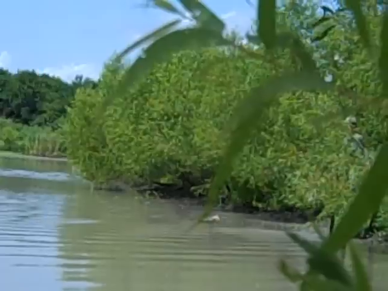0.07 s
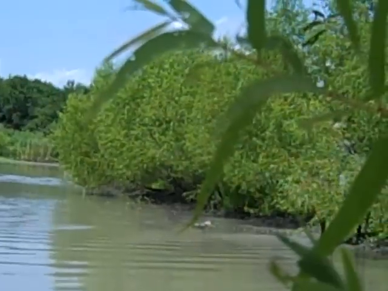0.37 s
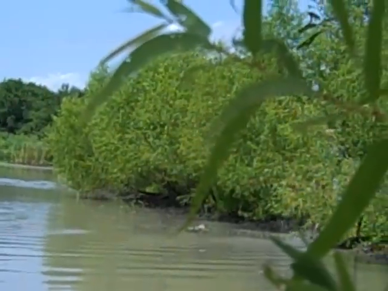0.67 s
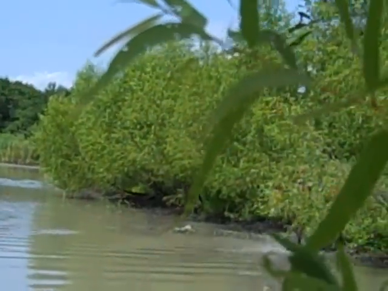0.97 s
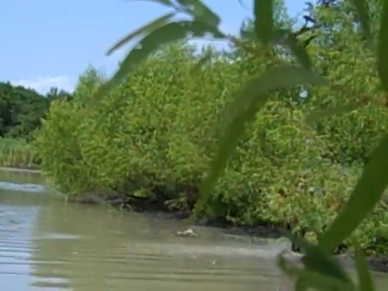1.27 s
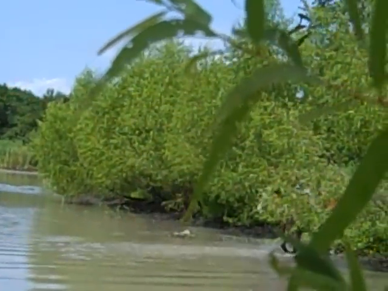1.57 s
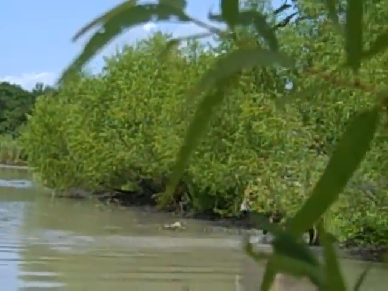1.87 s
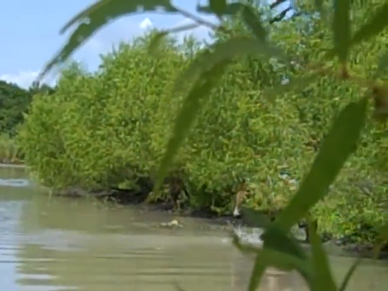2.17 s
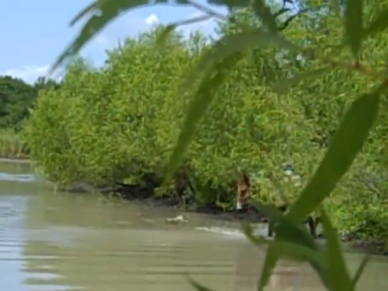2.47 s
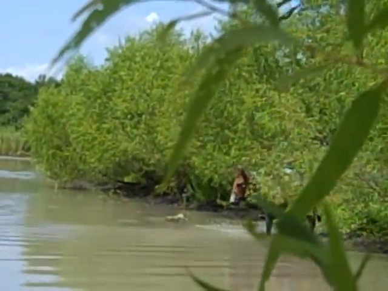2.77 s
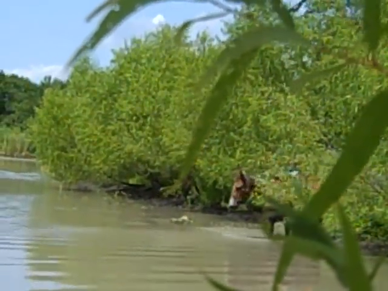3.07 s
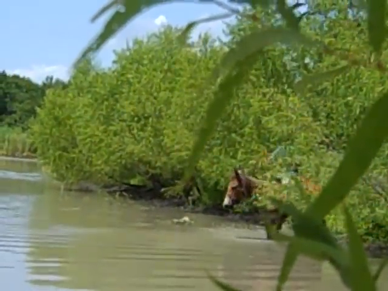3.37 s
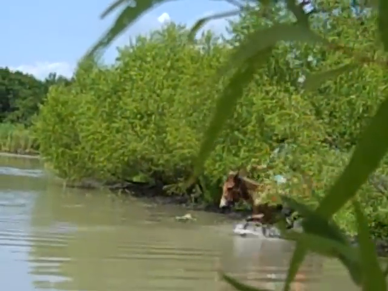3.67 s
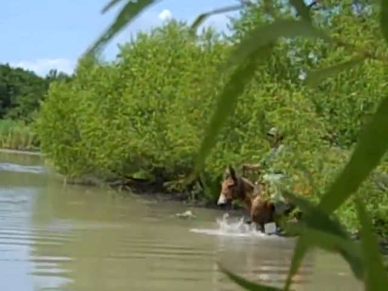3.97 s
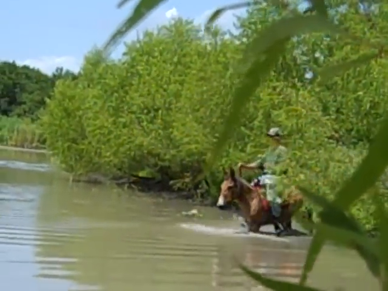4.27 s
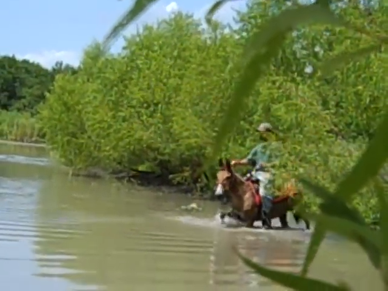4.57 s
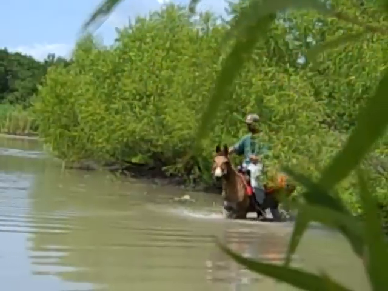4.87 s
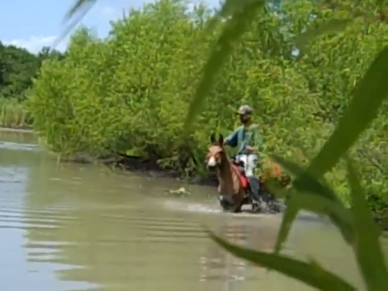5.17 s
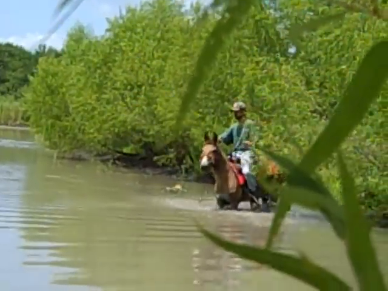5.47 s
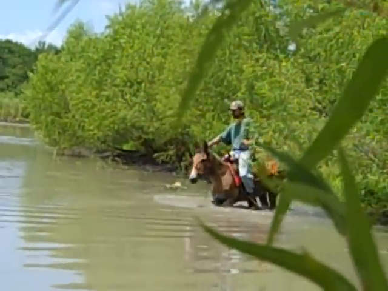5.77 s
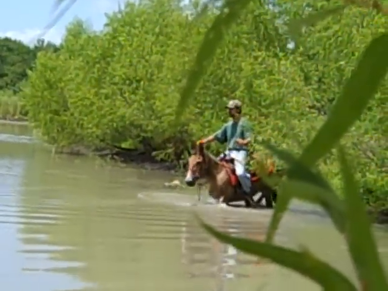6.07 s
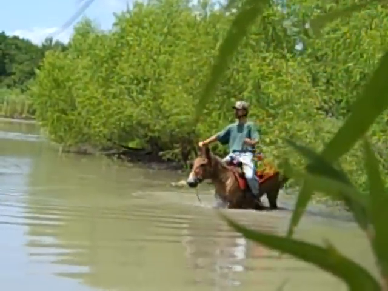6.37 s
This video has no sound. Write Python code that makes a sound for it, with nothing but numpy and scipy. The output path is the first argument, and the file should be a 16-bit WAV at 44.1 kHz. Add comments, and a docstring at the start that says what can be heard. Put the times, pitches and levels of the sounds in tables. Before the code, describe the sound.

Katydids buzz and tick close by while a mule wades into a pond some way off, sloshing, splashing and gulping.

```python
"""Meadow katydids buzz and tick in the weeds close by, over a faint summer hush and soft mic bumps.
Each wing stroke is a tiny, very high rasp. Some way off, a mule carries its rider into a muddy pond:
its legs churn up swarms of bubbles, smack the water and leave air pockets that close with a gulp,
all with dull echoes from the bank. A motor hums far away, and one thin high chip sounds midway."""
import sys
import numpy as np
from scipy import signal
from scipy.fft import rfft, irfft, next_fast_len
from scipy.io import wavfile

SR = 44100
rng = np.random.default_rng(int(sys.argv[2]) if len(sys.argv) > 2 else 0)


def store_wav(level_fs):
    """Save 16-bit WAV to argv[1]."""
    pcm = np.round(np.clip(np.atleast_2d(level_fs), -1, 1) * 32767)
    wavfile.write(sys.argv[1], SR, pcm.T.astype(np.int16))


N = 283122

USUAL, SLOW, FAST, TICKS_PER_S = 63, 43.5, 126, 23.4   # wing strokes per second
# close katydid buzzes: (first stroke [s], last stroke [s], stroke rate [1/s], final level [dB])
BUZZES = [(0.1475, 0.3275, USUAL, -40.5), (0.863, 1.411, SLOW, -46), (1.4777, 1.9105, USUAL, -41),
          (1.5048, 1.922, FAST, -40.5), (1.9973, 2.4544, USUAL, -45), (2.698, 3.1098, USUAL, -41),
          (2.7606, 2.968, FAST, -41.5), (3.2506, 3.648, USUAL, -45), (3.6743, 4.2717, USUAL, -39.5),
          (4.36, 4.5849, USUAL, -46), (4.829, 5.2614, USUAL, -41.5), (5.4491, 5.847, USUAL, -40),
          (6.293, 6.416, USUAL, -43)]
# runs of katydid ticks: (first tick [s], last tick [s], level [dB])
TICK_RUNS = [(0.404, .543, -45), (.674, 0.824, -43), (0.922, .969, -42), (1.212, 1.32, -36),
             (2.01, 2.088, -43), (2.49, 2.678, -35), (3.413, 3.553, -39), (3.726, 3.816, -37),
             (4.651, 4.786, -39), (5.235, 5.358, -36), (6.127, 6.251, -38.5)]
# tone colour of the close wings: (frequency [Hz], level [dB])
WING_COLOUR = [(6000, -28.5), (7600, -17), (8500, -14), (9200, -7.5), (10000, -2.5), (11000, -1),
               (12000, -1.5), (13200, -3.5), (14400, -4), (15300, -24), (16000, -4.5)]
# fader ride of the distant katydid chorus: (time [s], level [dB])
CHORUS_LEVEL = [(.14, -44.5), (.45, -42.5), (1.0, -40.5), (1.8, -42), (2.2, -44), (2.6, -40.5),
                (3.25, -43.5), (4.0, -40.5), (6.42, -40.5)]
# tone colour of that chorus: (frequency [Hz], level [dB])
CHORUS_COLOUR = [(6000, -23), (7400, -15), (8100, -8.5), (8800, -2.5), (10000, -4.5), (11000, -1.5),
                 (12200, -2.5), (13500, 0), (15000, -4.5), (16000, -1.5)]
# tone colour of the outdoor hush: (frequency [Hz], level [dB])
HUSH_COLOUR = [(20, 6.5), (45, -4.5), (70, -5.5), (120, -6), (250, -9.5), (500, -7.5), (1000, -10.5),
               (1700, -11), (3300, -5.5), (6000, -10), (16000, -16)]
# low bumps at the microphone: (time [s], level [dB], rise [s], recovery [s])
MIC_BUMPS = [(.135, -45, 0.00034, 0.15), (.158, -34, 0.00037, 0.0011), (.252, -42, 0.00043, 0.016),
             (.306, -48.5, 0.00039, 0.16), (1.44, -49, 0.013, 0.062), (1.97, -47, .012, 0.11),
             (3.08, -49, .012, 0.11), (5.3, -47.5, .012, 0.08)]
# trickle between steps, stronger once the mule is in deep: (time [s], level [dB])
TRICKLE_LEVEL = [(.3, -68), (1.0, -59.5), (1.7, -62.5), (2.5, -59), (3.3, -72.5), (3.9, -52.5), (5.3, -55),
                 (6.42, -56)]
# a leg drags through the water: (time [s], length [s], spray level [dB], slosh level [dB])
LEG_SWEEPS = [(0.382, 0.039, -69, -58.5), (0.563, 0.053, -54, -70), (.79, 0.41, -54.5, -66),
              (1.24, 0.16, -58, -69), (1.77, 0.14, -59, -61.5), (1.97, 0.51, -55, -67.5),
              (2.813, .16, -56.5, -65), (3.433, 0.071, -56.5, -68), (3.594, 0.21, -53.5, -65),
              (3.863, 0.26, -52, -68), (4.19, 0.26, -50, -60), (4.497, 0.13, -52, -58.5),
              (4.783, 0.18, -56, -59), (4.998, .22, -53, -55.5), (5.25, 0.21, -48, -61.5),
              (5.523, 0.2, -48.5, -60), (5.834, 0.086, -55, -57), (6.085, 0.12, -52.5, -55.5),
              (6.258, 0.13, -50, -60)]
# tone colour of churned water: (frequency [Hz], level [dB])
WATER_COLOUR = [(200, -20.5), (330, -2.5), (500, -3.5), (700, 2.5), (950, 1), (1300, 2), (1650, 2),
                (1950, 2), (2600, 1), (4000, -1.5), (6000, -3), (9000, -8.5), (15000, -5)]
# water thrown by a leg: (time [s], length [s], level [dB], centre [Hz])
SPLASHES = [(0.572, .05, -51, 1500), (0.654, 0.0068, -50.5, 4400), (.767, .015, -49.5, 5000),
            (0.879, 0.027, -51, 1800), (1.337, 0.031, -55.5, 1000), (1.538, 0.023, -51.5, 5500),
            (1.567, 0.027, -52, 1300), (1.767, 0.051, -51.5, 1960), (2.052, .051, -46, 1820),
            (2.203, .03, -53, 4700), (3.598, 0.042, -47.5, 1460), (3.638, .039, -50.5, 900),
            (3.878, 0.027, -52.5, 1500), (3.914, 0.046, -51.5, 900), (3.943, .08, -49.5, 5630),
            (4.255, 0.037, -46, 1630), (4.819, 0.088, -49.5, 1990), (4.912, 0.026, -46.5, 2410),
            (4.948, 0.0079, -42.5, 3320), (5.058, .012, -48.5, 1100), (5.293, 0.037, -47.5, 4000),
            (5.535, .085, -51, 2500), (5.836, 0.021, -51, 1100), (6.148, 0.033, -47, 2100),
            (6.255, 0.048, -48.5, 1100)]
# air pockets closing behind a leg: (time [s], pitch [Hz], level [dB])
PLOPS = [(.578, 750, -45), (.832, 392, -51), (.894, 695, -37), (1.005, 612, -51.5), (1.053, 493, -49),
         (2.085, 780, -52), (2.911, 1034, -43), (3.056, 1970, -39.5), (3.678, 720, -41),
         (3.937, 700, -45.5), (4.23, 408, -48.5), (4.263, 1200, -34), (4.265, 706, -41.5),
         (4.279, 1230, -37), (4.44, 1290, -34), (4.775, 783, -45), (5.07, 594, -48), (5.108, 2000, -32),
         (5.13, 878, -45), (5.156, 1250, -45), (5.218, 650, -49), (5.555, 600, -48), (5.837, 667, -45),
         (5.856, 630, -43), (6.238, 1190, -41)]
# sharp smacks on the water: (time [s], relative level [dB], centre [Hz])
SMACKS = [(0.72, -26.5, 6480), (0.8983, -23.5, 5000), (1.266, -26.5, 5000), (1.574, -31.5, 1500),
          (2.089, -28, 1490), (2.101, -23, 4150), (2.223, -26, 4570), (2.3666, -28.5, 2780),
          (2.829, -30, 5500), (3.617, -26, 1800), (4.263, -30, 1200), (4.406, -25.5, 3100),
          (4.4332, -23.5, 3700), (4.908, -15, 3750), (4.916, -18.5, 4500), (5.311, -26, 3000),
          (5.6233, -27, 2300), (6.177, -26.5, 1690)]
# echoes off the bank and bushes: (delay [s], level [dB])
BANK_ECHOES = [(.007, -24.5), (.019, -22), (.043, -18), (.071, -18)]
# fader ride of the far motor: (time [s], level [dB])
MOTOR_LEVEL = [(0.45, -82), (1.01, -73.5), (2.2, -73.5), (2.51, -83), (3.86, -69.5), (5.14, -67.5),
               (6.2, -79), (6.42, -92)]
# a thin high chip: (time [s], pitch [Hz], level [dB], 60 dB decay [s])
CHIP = [(2.829, 7070, -45.5, 0.071)]


def from_db(db):
    """Decibels to gain."""
    return 10 ** (np.asarray(db) / 20)


def rms_one(x):
    """Scale to unit rms."""
    return x / np.sqrt(np.mean(x ** 2) + 1e-20)


def clock():
    """Time of every sample."""
    return np.arange(N) / SR


def fader(points):
    """A level ride in dB, one value per sample."""
    return np.interp(clock(), *np.transpose(points))


def at_hz(points, hz):
    """Read a tone colour on a log-frequency axis."""
    f, db = np.transpose(points)
    return np.interp(np.log(hz + 1e-9), np.log(f), db)


def add(out, s, sound):
    """Drop a short sound in at s seconds."""
    i = int(np.clip(round(s * SR), 0, N))
    out[i:i + len(sound)] += sound[:N - i]


def drift(per_s):
    """Smooth random wander, rms 1."""
    knots = rng.standard_normal(8192)
    return rms_one(np.interp(clock() * per_s, np.arange(len(knots)), knots))


def band(x, low, high):
    """Gentle band-pass."""
    sos = signal.butter(2, [low, min(high, SR / 2 - 1000)], "band", fs=SR, output="sos")
    return signal.sosfilt(sos, x + 1e-18)


def coloured(x, colour):
    """EQ that keeps the power of white noise."""
    size = next_fast_len(N)
    gain = from_db(at_hz(colour, np.arange(size // 2 + 1) * SR / size))
    return irfft(rfft(x, size) * rms_one(gain), size)[:N]


def strokes(first, last, per_s):
    """Evenly spaced wing strokes, first to last."""
    return np.linspace(first, last, int(round((last - first) * per_s)) + 1)


def katydids(stroke_s=0.0024, tick_s=0.0031, uneven_db=0.35, swell_db_per_s=4.5):
    """Each wing stroke drags a file over a scraper: a few ms of high rasp. Buzzes grow as they go."""
    power, t = np.zeros(N), np.arange(-SR // 50, SR // 50) / SR
    stroke, tick = np.exp(-.5 * (t / stroke_s) ** 2), np.exp(-.5 * (t / tick_s) ** 2)
    for first, last, per_s, final_db in BUZZES:
        duty = per_s * stroke.sum() / SR   # keeps the level independent of stroke rate
        for s, chance in zip(strokes(first, last, per_s), rng.standard_normal(128)):
            db = final_db - swell_db_per_s * (last - s) - uneven_db * chance
            add(power, s + t[0], from_db(db) ** 2 * stroke / duty)
    for first, last, db in TICK_RUNS:
        for s in strokes(first, last, TICKS_PER_S):
            add(power, s + t[0], from_db(db) ** 2 * tick)
    return coloured(np.sqrt(power) * rng.standard_normal(N), WING_COLOUR)


def katydid_chorus(flutter_db=1.4):
    """Farther off, many wing strokes blur into a fluttering hiss."""
    gain = from_db(fader(CHORUS_LEVEL) + flutter_db * drift(200))
    return coloured(gain * rng.standard_normal(N), CHORUS_COLOUR)


def outdoor_hush(level_db=-57.5):
    """A faint, steady bed of noise with a soft rumble."""
    return from_db(level_db) * coloured(rng.standard_normal(N), HUSH_COLOUR)


def mic_bumps(dull_hz=450):
    """Small, muffled pressure steps that leak away."""
    out, t = np.zeros(N), np.arange(SR) / SR
    for s, db, rise, recovery in MIC_BUMPS:
        add(out, s, -from_db(db) * (1 - np.exp(-t / rise)) * np.exp(-t / recovery))
    return signal.sosfilt(signal.butter(2, dull_hz, fs=SR, output="sos"), out + 1e-18)


def swell(length, rise_s, fall_s):
    """Attack, hold, release."""
    t = np.arange(int((length + 6 * fall_s) * SR)) / SR
    return (1 - np.exp(-t / rise_s)) * np.exp(-np.maximum(t - length, 0) / fall_s)


def stirring(lap_db=-5.5):
    """Slosh and spray levels in dB: over the trickle, water piles up before each leg and runs back."""
    trickle_db = fader(TRICKLE_LEVEL)
    slosh, spray = from_db(trickle_db + lap_db) ** 2, from_db(trickle_db) ** 2
    for s, length, spray_db, slosh_db in LEG_SWEEPS:
        shape = swell(length, rise_s=0.017, fall_s=0.039)
        add(slosh, s, (from_db(slosh_db) * shape) ** 2)
        add(spray, s, (from_db(spray_db) * shape) ** 2)
    return 10 * np.log10([slosh, spray])


def grains(per_s, spread_db=2.5):
    """Random clicks, mostly small, a few large; rms 1."""
    sizes = from_db(spread_db * np.minimum(rng.exponential(1, N), 3)) * rng.choice([-1, 1], N)
    return rms_one(sizes * (rng.random(N) < per_s / SR))


def churn(slosh_trim_db=-3.0, spray_trim_db=-2.5, surge_db=1.05, patchy_db=2.5):
    """Swarms of small bubbles in third-octave sizes ride the stirring and flare with each splash."""
    edges = np.geomspace(200, 16000, 20)
    centres = np.sqrt(edges[1:] * edges[:-1])
    share = from_db(at_hz(WATER_COLOUR, centres)) ** 2 * np.diff(edges)
    share /= share.sum()
    bursts = splash_power(centres, share)
    slosh_db, spray_db = stirring()
    slosh = from_db(slosh_db + slosh_trim_db) ** 2 / share[(centres > 350) & (centres < 1200)].sum()
    spray = from_db(spray_db + spray_trim_db) ** 2 / share[(centres > 1500) & (centres < 7000)].sum()
    out, surge = 0, surge_db * drift(140)
    for k, hz in enumerate(centres):
        fine = np.clip(np.log2(hz / 900), 0, 1)   # big bubbles slosh, small ones spray
        wash = share[k] * ((1 - fine) * slosh + fine * spray)
        fizz = grains(per_s=220 * np.sqrt(hz / 1000)) + 0.52 * rng.standard_normal(N)
        flicker = from_db(surge + patchy_db * drift(70))
        swarm = rms_one(band(fizz, edges[k], edges[k + 1]) * flicker)
        out += swarm * np.sqrt(wash + bursts[k])
    return out


def bubble(hz, t60, glide, rise_s):
    """A pocket of air rings down and rises in pitch as it nears the surface."""
    t = np.arange(int(t60 * SR) + 2) / SR
    phase = 2 * np.pi * np.cumsum(hz * (1 + glide * t / t60)) / SR
    return (1 - np.exp(-t / rise_s)) * from_db(-60 * t / t60) * np.sin(phase)


def gurgle(count=340, low_hz=550, high_hz=3400, cycles=15.6, lift_db=3.0, spread_db=3.5):
    """Single bubbles pop at random in the wake, louder the more the water is stirred."""
    out = np.zeros(N)
    slosh_db, spray_db = stirring()
    for when, fine, strength, life in rng.random((count, 4)):
        i, hz = int(when * (N - 1)), low_hz * (high_hz / low_hz) ** fine
        stirred_db = (1 - fine) * slosh_db[i] + fine * spray_db[i]
        db = stirred_db + lift_db + spread_db * min(-np.log(1 - strength), 2)
        t60 = cycles * (.5 + life) / hz
        add(out, i / SR, from_db(db) * bubble(hz, t60, glide=0.12, rise_s=0.00029))
    return out


def splash_power(centres, share, width_octaves=1.13):
    """Power envelope per band: thrown water raises a burst of bubbles around one size."""
    bursts = np.zeros((len(centres), N))
    for s, length, db, hz in SPLASHES:
        power = (from_db(db) * swell(length, rise_s=0.0022, fall_s=0.0092)) ** 2
        colour = share * np.exp(-(np.log2(centres / hz) / width_octaves) ** 2)
        for row, part in zip(bursts, colour / colour.sum()):
            add(row, s, part * power)
    return bursts


def plops(cycles=34, glide=0.092, rise_s=0.00076, shard_db=-6.0, scatter_octaves=0.27):
    """A large air pocket gulps shut, then breaks into three weaker ones of nearby sizes."""
    out = np.zeros(N)
    for s, hz, db in PLOPS:
        t60 = cycles / hz   # big pockets ring longer
        add(out, s, from_db(db) * bubble(hz, t60, glide, rise_s))
        for late, detune in zip(rng.random(3), rng.standard_normal(3)):
            shard = bubble(hz * 2 ** (scatter_octaves * detune), t60 / 2, glide, rise_s)
            add(out, s + late * t60 / 2, from_db(db + shard_db) * shard)
    return out


def smacks(band_ratio=1.9, trim_db=-14.5, snap_db=3.5, snap_s=0.00042, t60_s=.023):
    """A leg slaps the water: a hard snap, then broad noise that dies in milliseconds."""
    out, t = np.zeros(N), np.arange(SR // 10) / SR
    for s, db, hz in SMACKS:
        crack = rms_one(band(rng.choice([-1., 1.], len(t)), hz / band_ratio, hz * band_ratio))
        shape = from_db(-60 * t / t60_s + snap_db * np.exp(-t / snap_s))
        add(out, s, from_db(db + trim_db) * crack * shape)
    return out


def with_bank_echoes(x, dull_hz=4500):
    """The direct sound plus a few dull reflections from the shore."""
    dull = signal.sosfilt(signal.butter(1, dull_hz, fs=SR, output="sos"), x)
    out = x.copy()
    for delay, db in BANK_ECHOES:
        add(out, delay, from_db(db) * dull)
    return out


def motor(firing_hz=148.4, wander_hz=0.604, waver_db=1.5):
    """A far engine at steady speed: its firing tone, with a weaker order on either side."""
    turn = np.pi * np.cumsum(firing_hz + wander_hz * drift(1.517)) / SR   # two firings a turn
    orders = from_db(-13) * np.sin(turn) + np.sin(2 * turn) + from_db(-10) * np.sin(3 * turn)
    return np.sqrt(2) * from_db(fader(MOTOR_LEVEL) + waver_db * drift(7.3)) * orders


def chip():
    """One faint, high ping that dies at once."""
    out, t = np.zeros(N), np.arange(SR // 10) / SR
    for s, hz, db, t60 in CHIP:
        add(out, s, from_db(db - 60 * t / t60) * np.sin(2 * np.pi * hz * t))
    return out


def scene():
    """Mono mix: echoing water across the pond, dry insects up front, a quiet bed behind."""
    water = with_bank_echoes(churn() + gurgle() + plops() + smacks())
    hush = outdoor_hush()
    insects = katydids() + katydid_chorus()
    return (insects + hush + mic_bumps() + water + motor() + chip())[None]


def record(dry):
    """The microphone opens a moment late; the top end is cut steeply."""
    open_s, cutoff_hz = .135, 15850
    low_pass = signal.ellip(12, .1, 80, cutoff_hz, fs=SR, output="sos")
    return signal.sosfilt(low_pass, dry * (clock() >= open_s))


dry = scene()
out = record(dry)
store_wav(out)
```